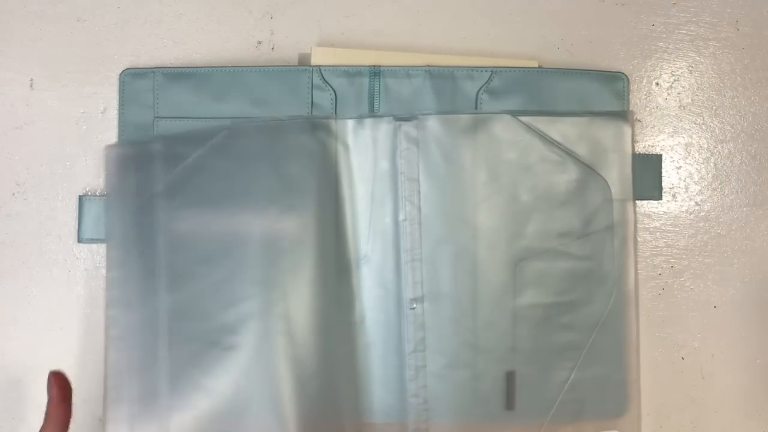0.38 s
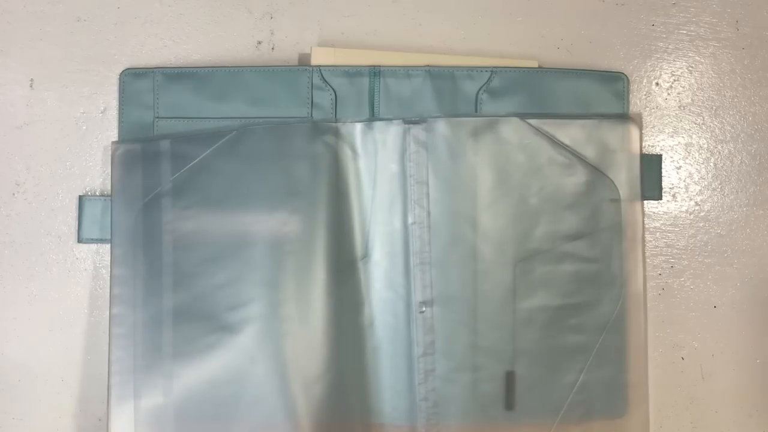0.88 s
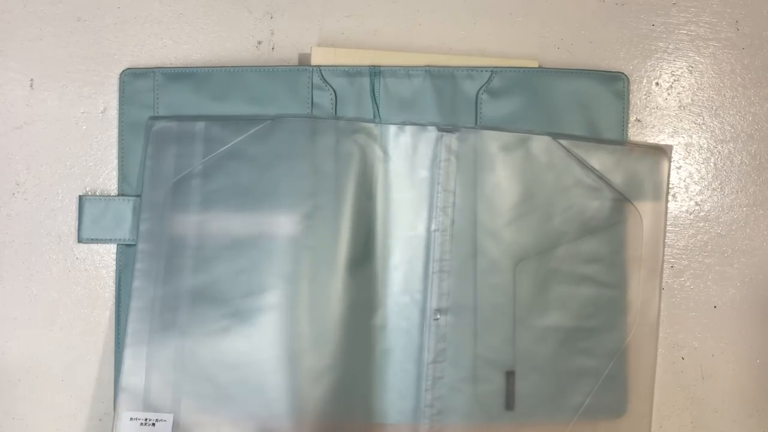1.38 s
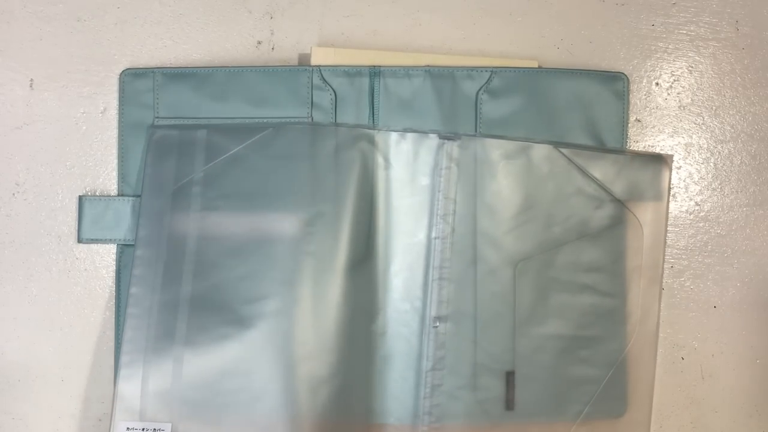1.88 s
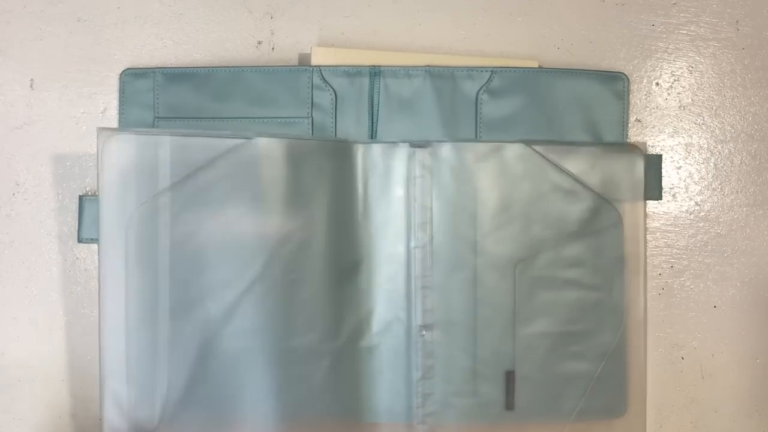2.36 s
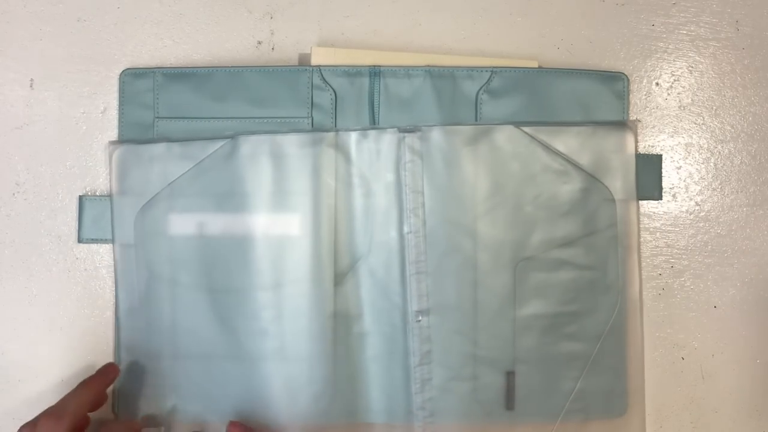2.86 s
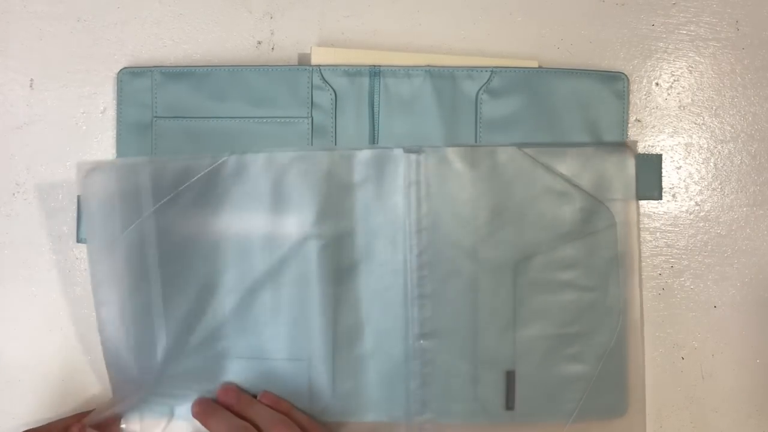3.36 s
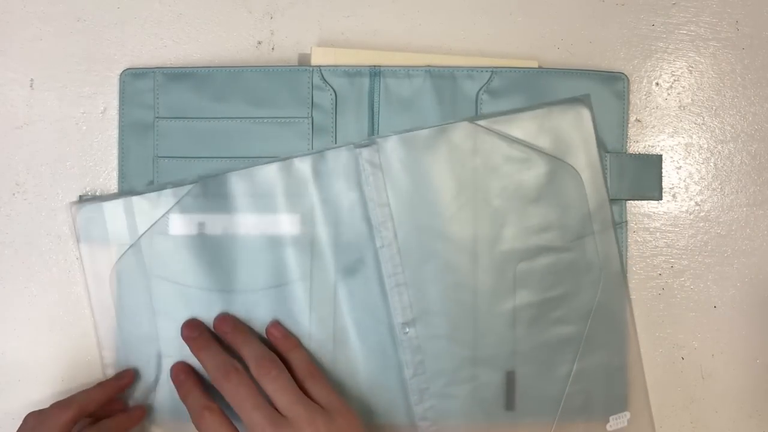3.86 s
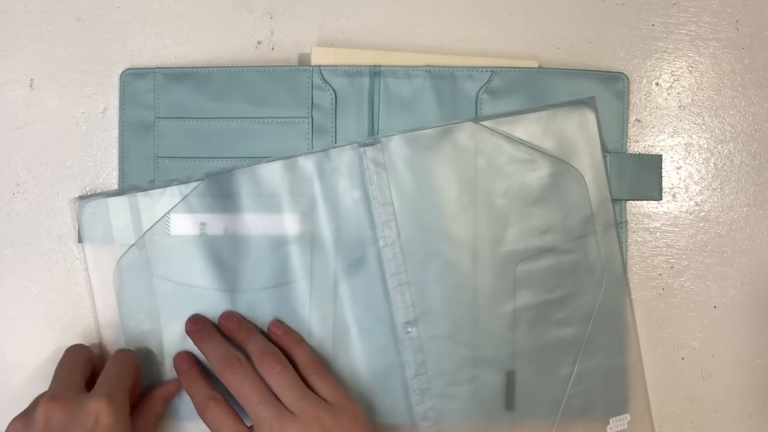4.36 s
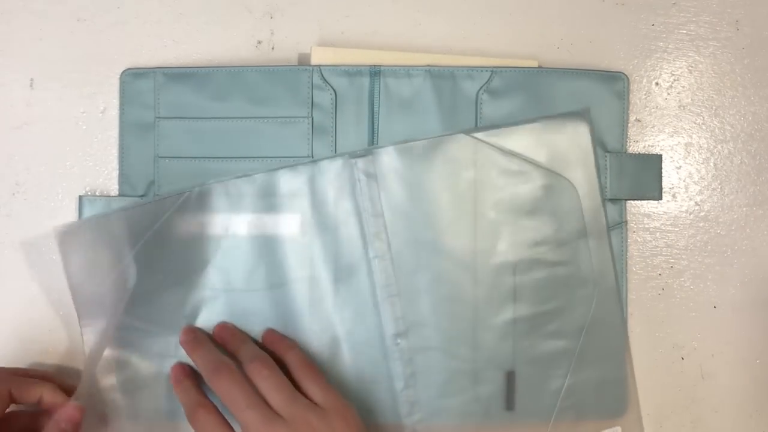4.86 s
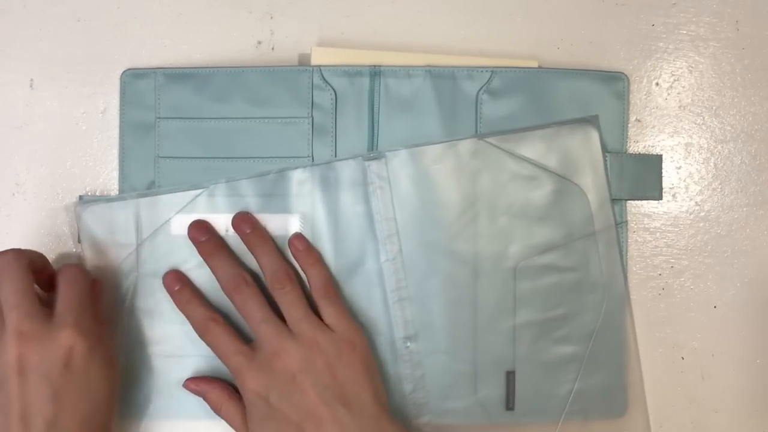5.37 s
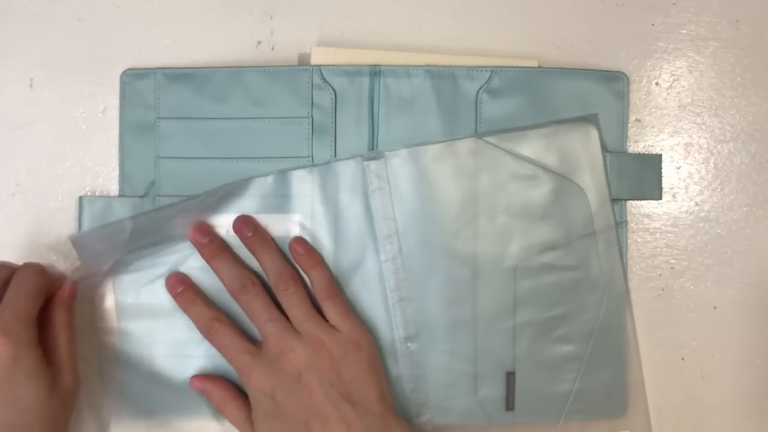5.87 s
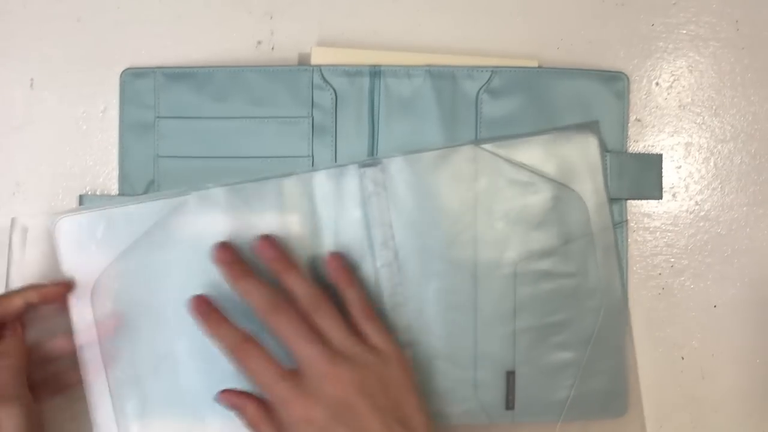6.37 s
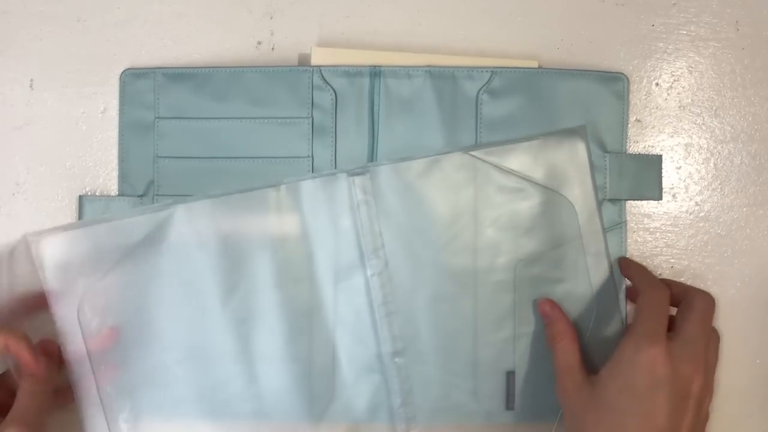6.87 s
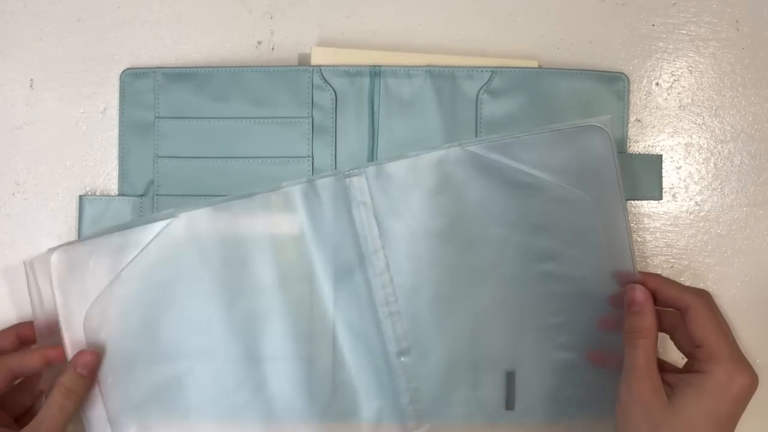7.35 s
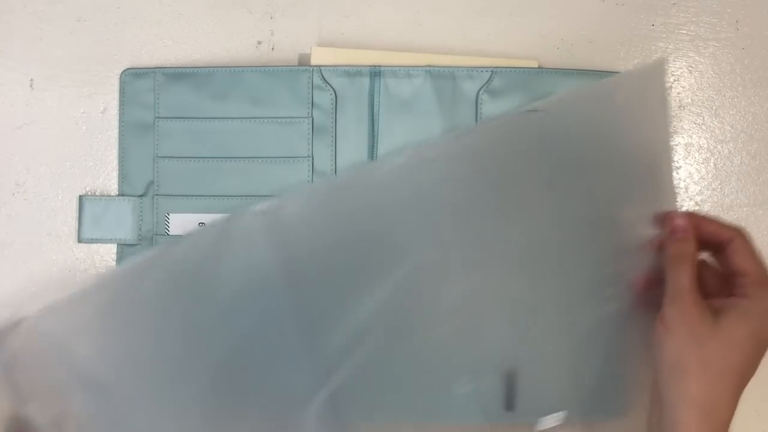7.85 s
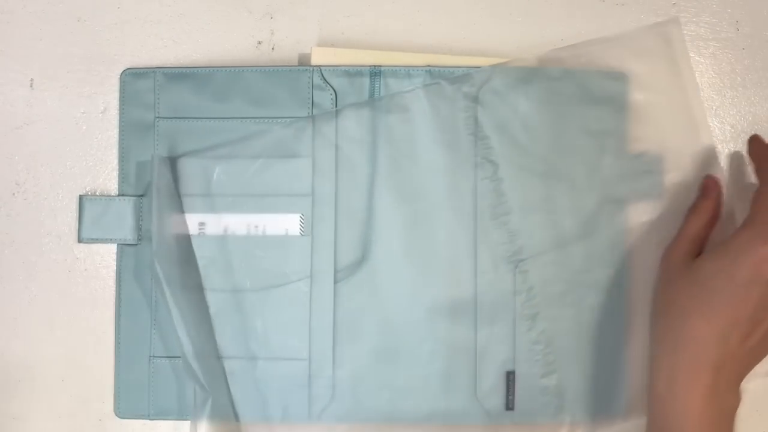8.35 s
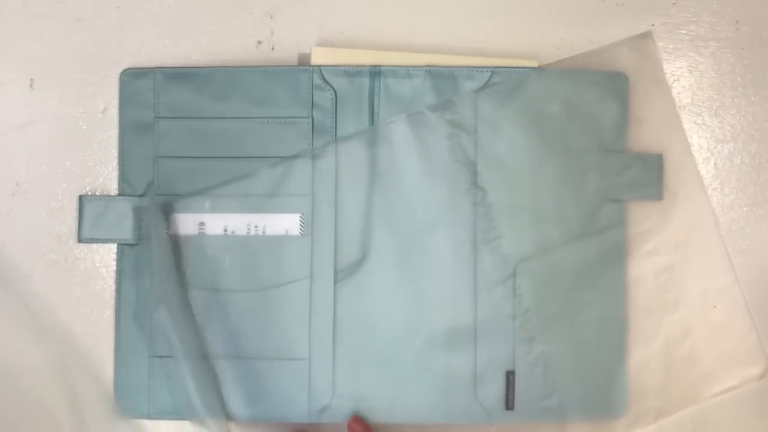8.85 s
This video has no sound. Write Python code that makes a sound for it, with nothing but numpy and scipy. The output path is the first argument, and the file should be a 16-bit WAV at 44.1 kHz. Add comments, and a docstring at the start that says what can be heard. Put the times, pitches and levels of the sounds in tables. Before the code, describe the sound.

Hands flex stiff clear plastic covers on a table, close to the microphone in a small quiet room. Faint rustle and isolated ticks come first, then loud snaps and quick sticky peeling bursts. Crackling grows brisk and crowded, with soft low bumps on the table. Near the end one sheet slides over another in a bright rush, followed by a few more crackles.

```python
"""Room noise with two faint tones, a low hum and swayed air run throughout: filtered noise and a wavering sine.
From the start hands flex stiff clear plastic sleeves: sheets rustle and crackle, creases buckle with dry snaps.
From 2.3 s sticky seams peel in fast trains of slips; from 4.7 s soft pushes make the table boom.
At 7.9 s one sheet slides along another: a bright rush; snaps and crackle go on after it.
Blows excite decaying noise in bands, and resonators near 1 kHz for the air pocket between the sheets."""
import sys
import numpy as np
from scipy import signal
from scipy.fft import rfft, irfft
from scipy.io import wavfile

SR = 44100
rng = np.random.default_rng(int(sys.argv[2]) if len(sys.argv) > 2 else 0)


def natural_amplitude(level_db):
    """Convert a level in decibels to a linear amplitude factor, elementwise."""
    exponent = np.asarray(level_db, float) / 20
    return 10 ** exponent


def store_pcm(level_fs):
    """Save levels as 16-bit WAV."""
    pcm = np.round(np.clip(level_fs, -1, 1) * 32767).astype(np.int16)
    wavfile.write(sys.argv[1], SR, np.atleast_2d(pcm).T)


N = 406998


def in_time(rows):
    """Columns of a curve (t/s first), interpolated at every sample."""
    s, *columns = np.transpose(rows)
    return [np.interp(np.arange(N) / SR, s, c) for c in columns]


def at_hz(points, hz):
    """Spectrum level, interpolated on a log-frequency axis."""
    point_hz, point_db = np.transpose(points)
    return np.interp(np.log(hz), np.log(point_hz), point_db)


def rms_one(x):
    """Scale to rms 1."""
    return x / np.sqrt(np.mean(x ** 2) + 1e-20)


def resonance(x, hz, width_hz):
    """Two-pole resonator, peak gain 1."""
    r = np.exp(-np.pi * width_hz / SR)
    zeros = [(1 - r * r) / 2, 0, (r * r - 1) / 2]
    poles = [1, -2 * r * np.cos(2 * np.pi * hz / SR), r * r]
    return signal.lfilter(zeros, poles, x)


def coloured(spectrum):
    """Steady noise of a given spectrum, rms 1."""
    hz = np.maximum(np.arange(N // 2 + 1) * SR / N, 1)
    white = rfft(rng.standard_normal(N))
    return rms_one(irfft(white * natural_amplitude(at_hz(spectrum, hz)), N))


def drift(rate_hz):
    """Low-passed random wander, rms 1."""
    r = np.exp(-2 * np.pi * rate_hz / SR)
    wander = signal.lfilter([1], [1, -2 * r, r * r], rng.standard_normal(N + SR))
    return rms_one(wander[SR:])  # drop the filter's start


def dying(s, db, grain, t60_s, click):
    """Each blow is a click plus a noise tail that decays exponentially."""
    blows = np.full(N, 1e-18)
    np.add.at(blows, np.clip((s * SR).astype(int), 0, N - 1), natural_amplitude(db))
    tail = signal.lfilter([1], [1, -natural_amplitude(-60 / (t60_s * SR))], blows)
    return click * blows + grain * tail


# room air spectrum: (f/Hz, level/dB)
ROOM = [(18, -40.5), (30, -11.5), (55, -0.5), (105, 6.5), (154, -4.5), (323, -6), (493, -10), (1060, -10),
        (1490, -18.5), (2800, -20), (7500, -28), (15700, -20.5), (16500, -38)]
# steady room tones: (f/Hz, width/Hz, level/dB rms)
TONES = [(199.9, 7.3, -74), (318.7, 10, -73.5)]


def room_noise(air_db=-66):
    """Steady coloured air noise plus two tones of narrow-band noise."""
    noise = natural_amplitude(air_db) * coloured(ROOM)
    for hz, width_hz, db in TONES:
        noise = noise + natural_amplitude(db) * rms_one(resonance(rng.standard_normal(N), hz, width_hz))
    return noise


# hum level: (t/s, level/dB)
HUM = [(0, -73.5), (.9, -70), (1.1, -78), (8.1, -80.5), (8.3, -61.5), (9.23, -59.5)]


def low_hum(hz=49, waver_hz=1.2, waver_db=1.2):
    """Sine wandering in pitch and level."""
    phase = 2 * np.pi * np.cumsum(hz + waver_hz * drift(8.2)) / SR
    level = natural_amplitude(in_time(HUM)[0] + waver_db * drift(3.88))
    return level * np.sqrt(2) * np.sin(phase)


# shifts of the sheets in the hands: (t reached/s, held/s, level/dB, air pocket re rustle/dB)
MOVES = [(0.0, 0.074, -61, -0.5), (0.221, 0.58, -71.5, 3), (1.059, 0.28, -67.5, -2.5),
         (1.499, 0.52, -75, -1.5), (2.28, 0.4335, -58.5, -3), (2.62, 0.21, -64.5, -7),
         (3.001, 0.82, -61, -11.5), (3.281, 0.062, -56.5, -7), (3.385, 0.04, -48, -23.5),
         (3.481, 0.218, -52.5, -13.5), (3.8, 0.053, -47.5, 3), (3.93, 0.14, -55, -11.5),
         (4.12, 0.093, -52, -6), (4.278, 0.19, -61.5, -0.5), (4.49, .1, -58, 2.5),
         (4.64, 0.099, -35.5, -27.5), (4.77, 0.068, -46.5, -11), (4.88, 0.153, -40, -5),
         (5.1, 0.087, -54, -11), (5.351, 0.19, -44, -6), (5.669, 0.031, -62, 14.5),
         (5.749, 0.063, -47, -16), (5.899, 0.11, -40.5, -1.5), (6.059, 0.064, -41.5, -17),
         (6.171, 0.118, -47.5, 0), (6.369, 0.067, -47, -4), (6.538, 0.23, -50, -1.5),
         (6.88, 0.068, -47, -1), (7.05, 0.34, -57, -3), (7.319, .3, -50, -4.5), (8.25, .13, -55, -10),
         (8.82, 0.16, -54.5, 0), (8.929, 0.193, -51, -21)]


def handling(rise_db_per_s=516.5, settle_db_per_s=239.5):
    """Moves swell, hold and settle; powers add, pocket balance is their power-weighted mean."""
    s, held_s, db, pocket_db = np.transpose(MOVES)[:, :, None]
    t = np.arange(0, N, 64) / SR
    rise = rise_db_per_s * np.maximum(s - t, 0)
    settle = settle_db_per_s * np.maximum(t - s - held_s, 0)
    power = natural_amplitude(db - rise - settle) ** 2
    total = power.sum(axis=0)
    pocket = (power * pocket_db).sum(axis=0) / total
    return in_time(np.transpose([t, 10 * np.log10(total), pocket]))


def swayed_air(hz=80, width_hz=90):
    """Moving sheets sway the air: low noise following half the handling level in dB."""
    low = resonance(rng.standard_normal(N), hz, width_hz)
    low = rms_one(resonance(low, hz, width_hz))
    return natural_amplitude(.5 * handling()[0] - 43) * low


# rustling sheet spectrum: (f/Hz, level/dB)
CRUMPLE = [(240, -43.5), (400, -16), (1430, 2.5), (6000, -2.5), (15700, -16), (16500, -31.5)]
# modes of the air between the sheets: (f/Hz, width/Hz, level/dB)
POCKET = [(1070, 130, 0), (1340, 170, -3), (1720, 260, -6), (780, 220, -14)]


def rustle(level_db=-9.5, flicker_db=5, pocket_gain_db=-0.5):
    """Rubbing sheets hiss unevenly and stir the air pocket."""
    db, pocket_db = handling()
    white = rng.standard_normal(N)
    pocket = rms_one(sum(natural_amplitude(g) * resonance(white, hz, width_hz) for hz, width_hz, g in POCKET))
    hiss = coloured(CRUMPLE) + natural_amplitude(pocket_db + pocket_gain_db) * pocket
    return natural_amplitude(db + level_db + flicker_db * drift(40.0)) * hiss


# snapping sheet spectrum: (f/Hz, level/dB)
SHEET = [(120, -54), (200, -17), (742, -11.5), (1470, -6), (2250, -9), (4450, -8), (14000, -8),
         (15600, -20), (16500, -34)]


def sheet(blows, t60_s, click, colour_db, level_db=0.0, pocket_gain_db=8.5, mode_db=5.5):
    """Each blow bends another patch: own random strength per half-octave band and pocket mode."""
    treble_gain_db, knee_hz = 7.0, 8000
    s, db, pocket_db, treble_db = blows.T
    edges = 250 * 2 ** np.arange(0, 6.3, .5)
    white = rng.standard_normal((2, N))
    own = rng.standard_normal((len(s), len(edges) + len(POCKET)))
    out = 0
    for k, (low, high) in enumerate(zip(edges, edges[1:])):
        hz = np.sqrt(low * high)
        treble = (treble_db + treble_gain_db) / (1 + (knee_hz / hz) ** 4)
        # large creases move more air in the low bands
        body = 0.47 * (pocket_db + 10.5) / (1 + (hz / 2500) ** 3)
        gain_db = db + level_db + at_hz(SHEET, hz) + treble + body + colour_db * own[:, k]
        band = signal.butter(2, [low, high], "band", fs=SR, output="sos")
        out = out + signal.sosfilt(band, dying(s, gain_db, white[k % 2], t60_s, click))
    for k, (hz, width_hz, mode_gain_db) in enumerate(POCKET):
        gain_db = db + pocket_db + pocket_gain_db + mode_gain_db + mode_db * own[:, -1 - k]
        puff = dying(s, gain_db, white[k % 2], t60_s=0.038, click=1.6)
        out = out + resonance(puff, hz, width_hz)
    return out


def cracks(size_db=4.5, lift_db=7.0, dull_db=-11.0, treble_db=-7.5, clump_db=3.5, vary_db=15.0):
    """Tiny cracks, sparse under slow handling, crowded when brisk; a few much larger."""
    base_per_s, base_db, busy_share = 85, -62, .35  # pace at that handling level; share of dB that quickens it
    level_db, pocket_db = handling()
    place, lot, size, tint = rng.random((4, 20000))
    at = (place * N).astype(int)
    busy_db = busy_share * (level_db[at] - base_db)
    per_s = base_per_s * natural_amplitude(busy_db + clump_db * drift(9.0)[at])
    born = lot * len(at) * SR / N < per_s  # thin the candidates to the pace
    db = level_db[at] - busy_db / 2 + lift_db - size_db * np.log(size + 0.036)
    treble = treble_db + vary_db * (tint - .5)
    blows = np.column_stack([at / SR, db, pocket_db[at] + dull_db, treble])[born]
    return sheet(blows, t60_s=.016, click=5, colour_db=5.5)


# buckling creases: (t/s, level/dB, air pocket re level/dB)
SNAPS = [(0.037, -35, -19.5), (0.1375, -42.5, -16.5), (0.1473, -43.5, -22), (0.1897, -37, -26.5),
         (0.2404, -39, -23), (0.2646, -39.5, -19.5), (0.5222, -36.5, -30.5), (0.5566, -41.5, -35),
         (0.633, -40.5, -30), (0.6443, -44, -20.5), (0.6975, -23.5, -38), (0.7256, -29, -23),
         (0.7981, -37, -33), (0.856, -33, -41), (1.0432, -31, -34.5), (1.1126, -43, -17),
         (1.1355, -26.5, -32), (1.1797, -34.5, -24), (1.2853, -39.5, -16.5), (1.3417, -29.5, -30.5),
         (1.3632, -36, -36), (1.4142, -38, -24), (1.4363, -49, -26.5), (1.5165, -46, -20.5),
         (1.8561, -45.5, -28), (2.146, -39, -22.5), (2.2129, -27, -34.5), (2.2637, -31, -24),
         (2.3185, -5.5, -24), (2.4118, -17.5, -31), (2.4219, -9.5, -35.5), (2.5421, -41.5, -21),
         (2.5625, -44, -15.5), (2.5798, -33.5, -18.5), (2.616, -33.5, -22.5), (2.6464, -37, -20),
         (2.6962, -37, -19.5), (2.755, -29, -21), (2.809, -33.5, -14), (2.8716, -38, -18),
         (2.8899, -23.5, -28), (2.9496, -40, -19), (2.9855, -32.5, -17), (3.044, -39.5, -25),
         (3.146, -31, -12.5), (3.215, -36.5, -25), (3.2829, -30, -21), (3.3066, -29.5, -20),
         (3.3541, -8, -27), (3.486, -27, -26.5), (3.5518, -37, -19.5), (3.5712, -23.5, -24.5),
         (3.5902, -19, -23.5), (3.6309, -29.5, -21), (3.7242, -19, -17.5), (3.8056, -21.5, -8.5),
         (3.8286, -27, -14), (3.8432, -13.5, -14.5), (3.903, -27.5, -14.5), (4.0274, -22, -25.5),
         (4.0881, -21.5, -20.5), (4.138, -47, -11.5), (4.1651, -25, -14.5), (4.1951, -25, -21),
         (4.2346, -39, -17.5), (4.471, -25.5, -16), (4.5543, -9.5, -36.5), (4.6198, -6, -29),
         (4.7487, -7.5, -27.5), (4.784, -21.5, -33), (4.832, -22.5, -18.5), (4.888, -20, -19.5),
         (4.9238, -19.5, -17.5), (4.9547, -21.5, -22), (4.9848, -14.5, -19.5), (5.1013, -27.5, -26.5),
         (5.3431, -24, -13), (5.3936, -22.5, -14), (5.4261, -23.5, -17.5), (5.448, -19, -18.5),
         (5.474, -16, -15.5), (5.5138, -21.5, -16.5), (5.7092, -31.5, -13), (5.7376, -23.5, -19),
         (5.7571, -23.5, -17.5), (5.8136, -28.5, -11.5), (5.8368, -28, -21.5), (5.8489, -9.5, -25.5),
         (5.9888, -27, -12), (6.1875, -28.5, -16.5), (6.2702, -27, -18.5), (6.397, -22, -27),
         (6.4178, -24, -27), (6.4755, -31.5, -15), (6.5033, -34, -5), (6.5356, -18, -13),
         (6.5525, -23.5, -15), (6.593, -33, -19.5), (6.6977, -27.5, -14.5), (6.764, -17.5, -12),
         (6.775, -17.5, -17), (6.8245, -33.5, -15.5), (6.8816, -28, -7.5), (6.898, -27.5, -15),
         (6.9396, -30.5, -17), (6.969, -20.5, -16), (7.0597, -30.5, -9), (7.1251, -29.5, -22.5),
         (7.143, -31, -17), (7.1651, -28, -17.5), (7.1982, -17, -34.5), (7.3033, -31.5, -14),
         (7.3534, -24, -17.5), (7.3661, -23.5, -19), (7.3912, -24.5, -19.5), (7.437, -20.5, -15.5),
         (7.5381, -25.5, -27), (7.5595, -25, -27), (7.7746, -29.5, -28), (7.8131, -32, -20),
         (7.9671, -22, -31), (8.384, -39.5, -16), (8.4803, -43, -9.5), (8.8026, -21.5, -16.5),
         (8.9336, -28.5, -16.5), (8.966, -23, -22.5), (9.0009, -22.5, -25), (9.0437, -29.5, -16.5),
         (9.0838, -29, -21), (9.1939, -20.5, -22.5)]


def snaps(after_db=-16.0, treble_db=-13.5, duller=0.4, longest_wait_s=.008):
    """A crease buckles in steps: main snap, then two weaker within ms; boomy creases are duller."""
    s, db, pocket_db = np.transpose(SNAPS)
    treble = treble_db - duller * (pocket_db - pocket_db.mean())
    steps = [np.column_stack([s, db, pocket_db, treble])]
    for _ in range(2):
        late_s = longest_wait_s * rng.random(len(s))
        loss_db = after_db * (.5 + rng.random(len(s)) / 2)
        steps.append(np.column_stack([s + late_s, db + loss_db, pocket_db, treble]))
    return sheet(np.vstack(steps), t60_s=.012, click=8, colour_db=3.5, level_db=3.5, pocket_gain_db=7.5)


# peeling seam: (start t/s, end t/s, slips/s, level/dB, air pocket re level/dB, taut strip f/Hz)
PEELS = [(2.3441, 2.373, 367, -10.5, -27, 4960), (2.385, 2.396, 440, -14.5, -22.5, 6170),
         (3.36, 3.383, 308, -9.5, -25, 4900), (3.3864, 3.407, 360, -10, -24.5, 4490),
         (3.942, 3.952, 420, -25, -7.5, 5454), (4.635, 4.673, 280, -11, -24, 5570),
         (4.671, 4.691, 310, -12.5, -15, 5130), (4.696, 4.74, 130, -11, -11.5, 5500),
         (5.005, 5.062, 334, -26, -17, 5250), (5.862, 5.868, 400, -9.5, -22.5, 4397),
         (5.874, 5.923, 350, -12.5, -20.5, 4420), (5.9288, 5.937, 315, -13.5, -17.5, 5504),
         (6.043, 6.061, 328, -17.5, -19.5, 5500), (6.0705, 6.088, 450, -19.5, -16, 5570),
         (6.0955, 6.122, 500, -23, -23, 5800)]


def slips(jitter=0.3, spread_db=2, first_db=2.5, treble_db=-6):
    """Stick-slip at a fairly even pace and force, first slip raised; one blow table per peel."""
    trains = []
    for start, end, per_s, db, pocket_db, _ in PEELS:
        pace, force = rng.standard_normal((2, 60))
        waits = np.exp(jitter * pace) / per_s
        s = start + np.cumsum(waits) - waits[0]
        slip_db = db + spread_db * force
        slip_db[0] += first_db
        same = np.ones(len(s))
        train = np.column_stack([s, slip_db, pocket_db * same, treble_db * same])
        trains.append(train[s < end])
    return trains


def seam(ring_db=-6.0, strip_width_hz=1500, t60_s=.011, click=17):
    """Slips shake the sheet and ring the taut strip beside the seam; grip sets its pitch."""
    trains, white = slips(), rng.standard_normal(N)
    strip = 0
    for train, peel in zip(trains, PEELS):
        blows = dying(train[:, 0], train[:, 1] + ring_db, white, t60_s, click)
        strip = strip + resonance(blows, peel[-1], strip_width_hz)
    shaken = sheet(np.vstack(trains), t60_s, click, colour_db=3.0, level_db=-1.5,
                   pocket_gain_db=11.0, mode_db=2.5)
    return shaken + strip


# hands on the table: (t/s, level/dB, boom f/Hz)
THUMPS = [ (4.7, -44, 101), (5.028, -49, 55.7), (5.672, -48, 54.3), (6.112, -45, 61.9), (8.764, -44, 90.4),
          (9.189, -44, 92.1)]


def thumps(rise_s=0.015):
    """Soft pushes boom the table: sines that swell and die away."""
    s, db, hz = np.transpose(THUMPS)[:, :, None]
    late = np.maximum(np.arange(N) / SR - s, 0)
    swell = late / rise_s * np.exp(1 - late / rise_s)
    return np.sum(natural_amplitude(db) * swell * np.sin(2 * np.pi * hz * late), axis=0)


# sliding sheet spectrum: (f/Hz, level/dB)
SLIDE = [(240, -12), (400, -10.5), (920, -1.5), (6200, 0.5), (10300, 2), (13000, 2), (15800, 2),
         (16500, -34)]


def swish(grain_db=1.5, catches_per_s=300, catch_db=5.5):
    """A sheet drawn across another: bright noise, rough with small catches; swells, sags, stops."""
    full_s, stop_s, full_db = 7.865, 8.29, -39.5
    rise_db_per_s, sag_db_per_s, stop_db_per_s = 600, 9.5, 299
    t = np.arange(N) / SR
    db = full_db - rise_db_per_s * np.maximum(full_s - t, 0)
    db = db - sag_db_per_s * np.maximum(t - full_s, 0)
    db = db - stop_db_per_s * np.maximum(t - stop_s, 0)
    at = np.flatnonzero(rng.random(N) < catches_per_s / SR)
    slide = coloured(SLIDE)
    catches = dying(at / SR, catch_db * rng.random(len(at)) ** 2, slide, t60_s=.011, click=1)
    return natural_amplitude(db + grain_db * drift(140.0)) * rms_one(slide + catches)


def walls(x, t60_s=0.21, cut_hz=11000, gap_s=.004):
    """Diffuse reflections: dulled noise decaying after a short gap, unit energy."""
    t = np.arange(SR // 2) / SR
    dull = np.exp(-2 * np.pi * cut_hz / SR)
    tail = signal.lfilter([1], [1, -dull], rng.standard_normal(len(t)))
    tail = tail * natural_amplitude(-60 * t / t60_s) * (t > gap_s)
    return signal.fftconvolve(x, tail / np.sqrt(np.sum(tail ** 2)))[:N]


def scene():
    """Plastic with its reflections over the room and bass."""
    plastic = rustle() + cracks() + snaps() + seam() + swish()
    bass = low_hum() + swayed_air() + thumps()
    return (plastic + natural_amplitude(-12.5) * walls(plastic) + bass + room_noise())[None]


def low_pass(x):
    """Removes everything above the highest recorded frequency."""
    return signal.sosfilt(signal.butter(12, 16990, fs=SR, output="sos"), x)


def record(dry):
    """Microphone with a treble dip, top cut, loudest peaks rounded."""
    dip_hz, dip_width_hz, dip_share = 10340, 1000, 0.58
    top = .7  # limit of the rounding
    heard = dry - dip_share * resonance(dry, dip_hz, dip_width_hz)
    cut = signal.cheby2(8, 50, 16700, fs=SR, output="sos")
    mix = top * np.tanh(signal.sosfilt(cut, heard) / top)
    return low_pass(mix)


dry = scene()
out = record(dry)
store_pcm(out)
```